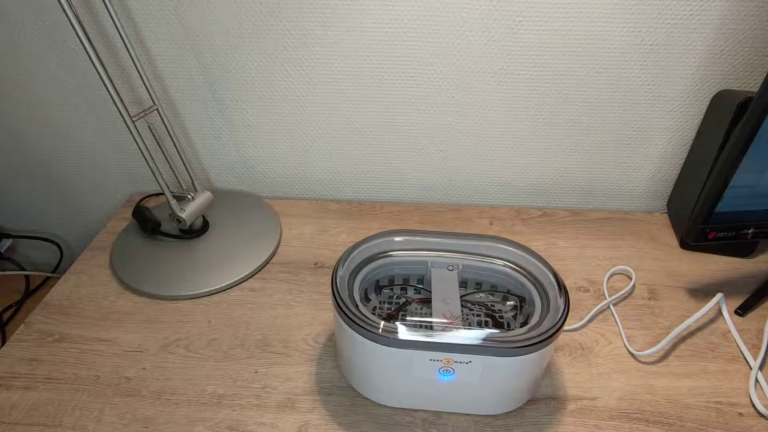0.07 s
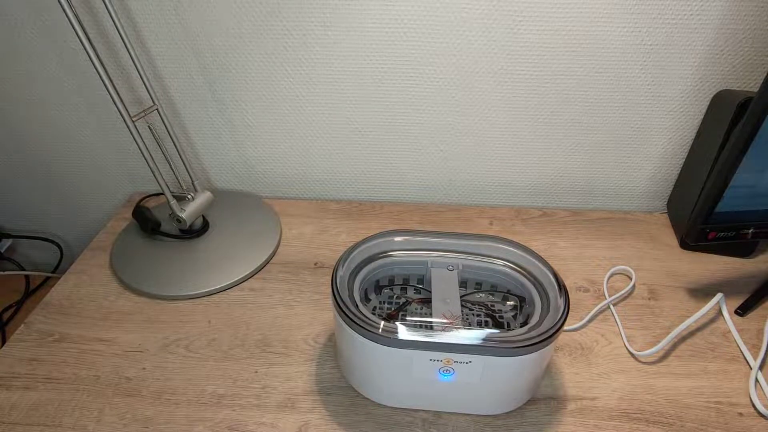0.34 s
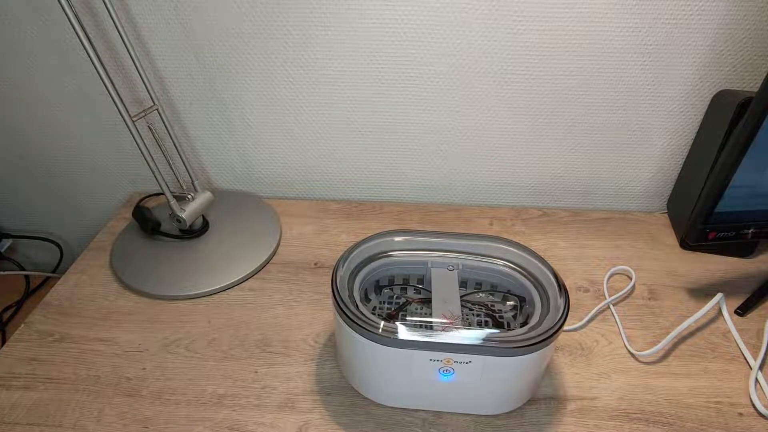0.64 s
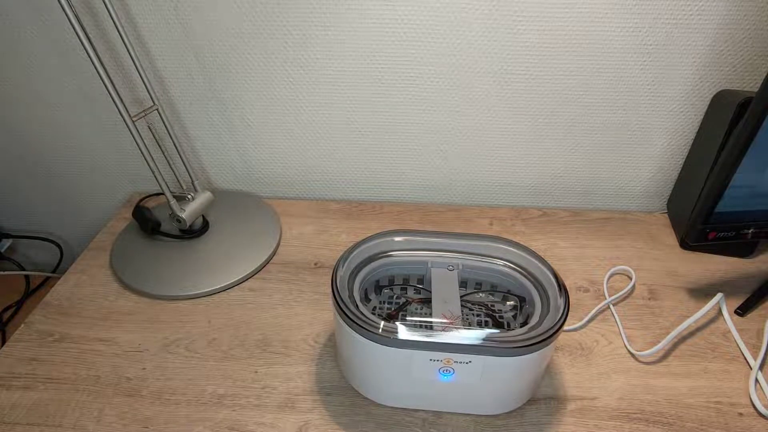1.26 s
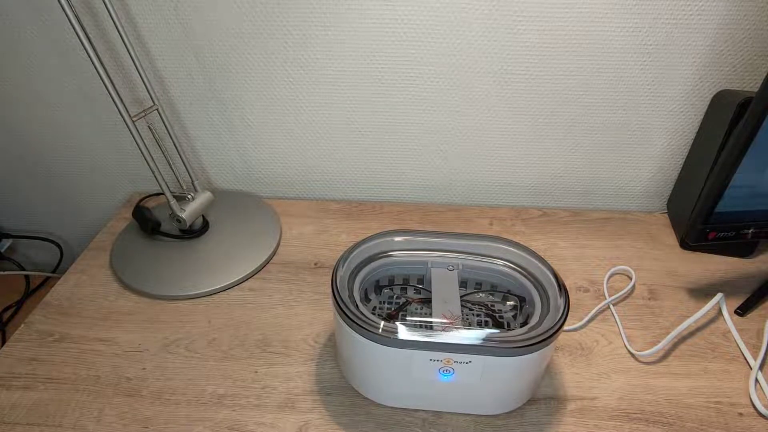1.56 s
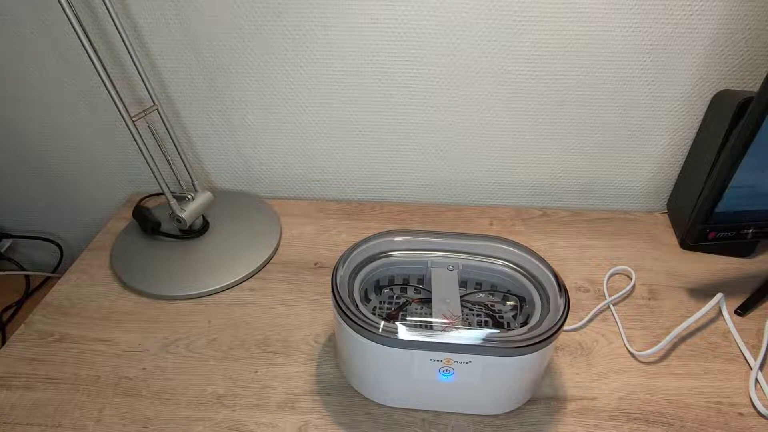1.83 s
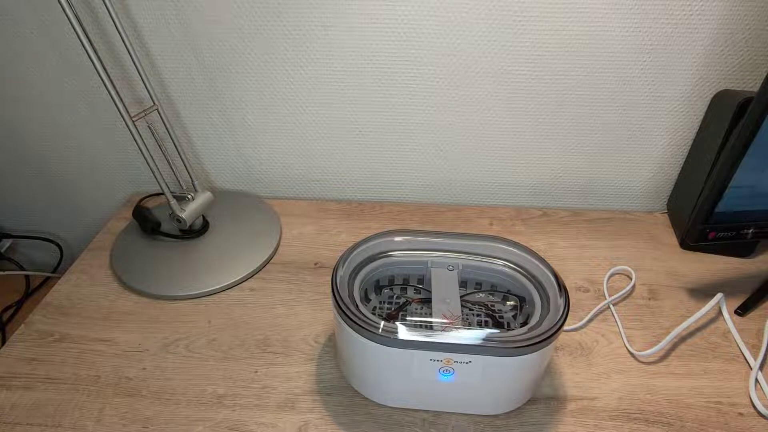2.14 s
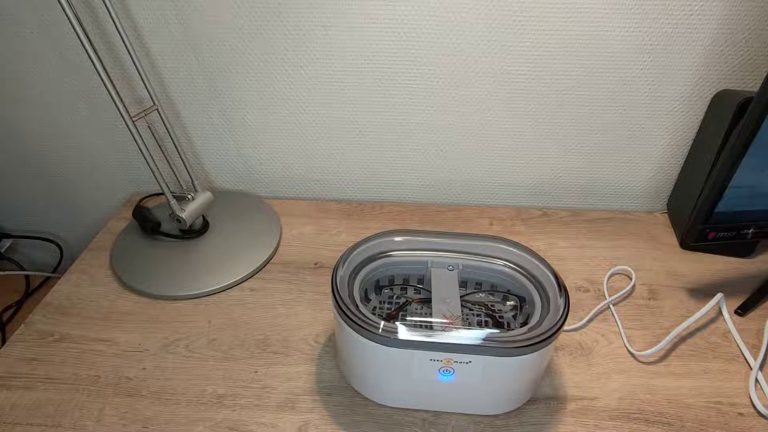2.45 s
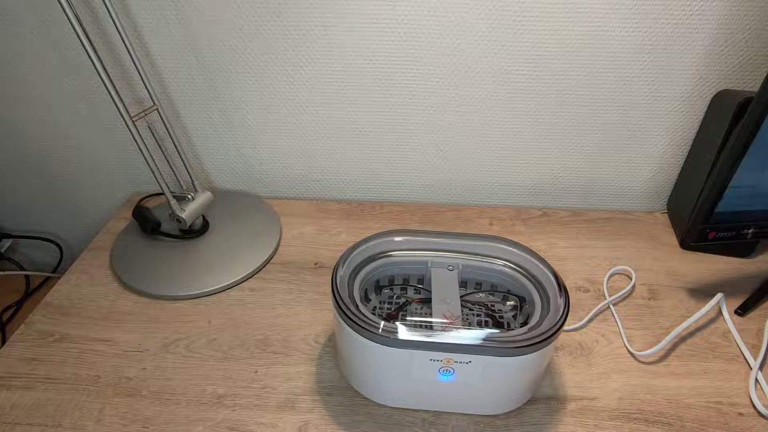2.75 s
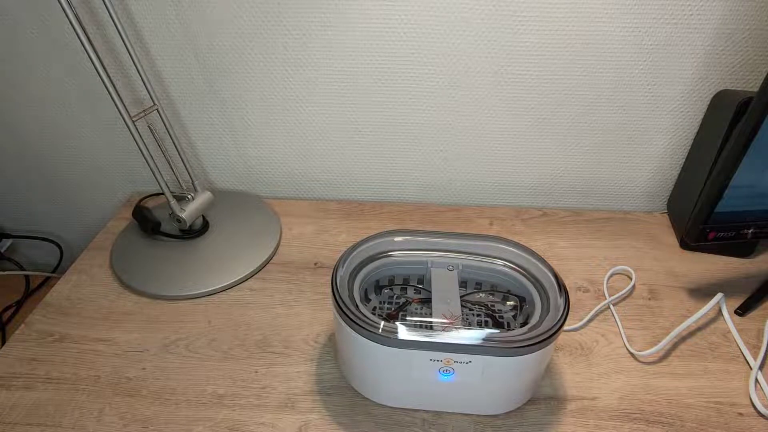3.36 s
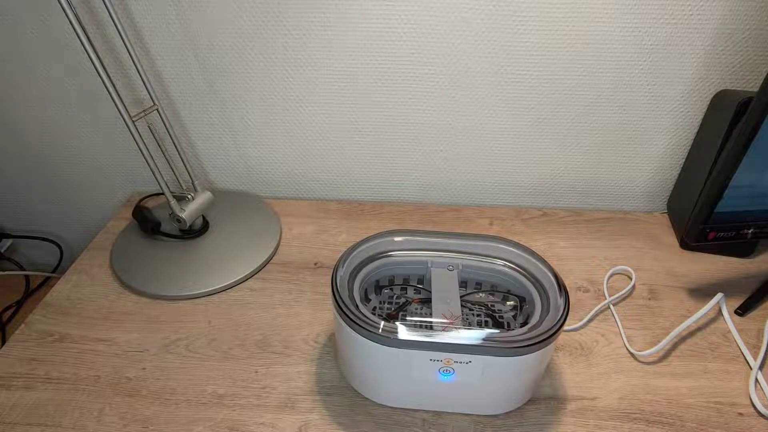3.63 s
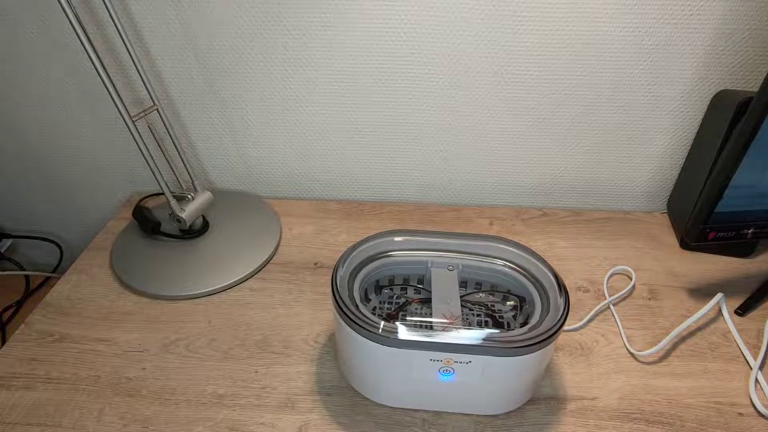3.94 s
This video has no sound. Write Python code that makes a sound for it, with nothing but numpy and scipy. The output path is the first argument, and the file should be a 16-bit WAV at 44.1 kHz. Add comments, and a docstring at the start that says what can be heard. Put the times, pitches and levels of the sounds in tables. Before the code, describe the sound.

A small ultrasonic cleaner runs close by for the whole four seconds, making a steady electric buzz with a high, fizzing hiss and tiny pings from the water tank. At about 0.2 seconds the bath sputters in a quick run of sharp ticks. The buzz and hiss carry on evenly, and at about 3.8 seconds something gives a short, bright, ringing rattle in the tank.

```python
"""A steady buzz and a fizzing hiss: a small ultrasonic cleaner runs on a desk in a small room.
Its drive swells once per mains cycle. Each swell knocks the tank (the buzz) and makes tiny bubbles
collapse in the water (the hiss, called cavitation); single big collapses make the tank ping.
The bath sputters briefly near the start and gives a short ringing rattle near the end.
Two dull scuffs and a faint rumble lie below."""
import sys
import numpy as np
from scipy import signal
from scipy.fft import rfft, irfft
from scipy.io import wavfile
from scipy.ndimage import uniform_filter1d

SR = 44100
rng = np.random.default_rng(int(sys.argv[2]) if len(sys.argv) > 2 else 0)


def dump(signal):
    """Clip the signal to [-1, 1] and save it as 16-bit WAV at the path in sys.argv[1]."""
    limited = np.clip(np.atleast_2d(signal).T, -1, 1)
    pcm = np.round(limited * 32767).astype(np.int16)
    wavfile.write(sys.argv[1], SR, pcm)


N = 176400
T = np.arange(N) / SR
BINS = np.fft.rfftfreq(N, 1 / SR)
MAINS_HZ = 49.986
BURST_START_S, BURST_RISE_S = 0.015, 0.0052  # timing of the hiss bursts

# Stereo width, as the side (left minus right) against the middle: f/Hz, level/dB
WIDTH = [(100, -19), (300, -14), (600, -8), (1000, -1.5), (1300, -7), (1650, -2), (2100, -7), (2600, -3.5),
         (3000, -19), (3400, -9.5), (3800, -3.5), (4800, -1.5), (7500, -1), (11000, 0), (14000, -1.5),
         (15700, -4)]


def tank_buzz(count=180, size=882, groups=4):
    """The same knocks repeat every mains cycle and blur into a buzz that wavers as the water moves."""
    # Lower harmonics of the buzz: multiple of the mains frequency, relative level/dB
    harmonics = [(1, -32.5), (2, -33), (3, -57), (4, -28.5), (5, -9.5), (6, -18.5), (7, -13.5), (8, -16),
                 (9, -7.5), (10, -14.5), (11, -4.5), (12, 0.5), (13, -10), (14, -3.5), (15, -10.5),
                 (16, -4), (17, -2), (18, -8.5), (19, -7), (20, -19), (21, -10.5), (22, -11), (23, -8.5),
                 (24, -4.5), (25, -5.5), (26, -4), (27, -8), (28, -9), (29, -6), (30, -56)]
    # Outline of the upper harmonics: f/Hz, relative level/dB
    upper_outline = [(1550, -13.5), (1700, -24.5), (1800, -10), (2150, -26), (2400, -16.5), (2550, -28.5),
                     (2800, -12.5), (2980, -4), (3080, -12), (3150, -5), (3270, -22.5), (3410, 1.5),
                     (3600, -7), (3740, -13), (3900, -17), (4050, -6.5), (4300, -15), (4600, -14.5),
                     (5650, -20.5), (6300, -15), (9000, -27)]
    # The four knocks in each cycle: t/s after the first, relative level/dB
    knocks = [(0, 0), (.0036, -4), (.0096, -3), (.0135, -9)]
    # Slow swell of the buzz: t/s, gain/dB
    swell = [(0, -2.7), (.6, 0), (1.2, .3), (1.8, 0.3), (2.4, 0), (3, -0.26), (4, -0.5)]
    first_knock_s, mid_lag_s = .0163, .001435
    waver_db, waver_rad = 1.43, 0.092
    k = np.arange(1, count + 1)
    hz, age = k * MAINS_HZ, np.arange(size) / SR
    level_db = at_hz(upper_outline, hz) - 62
    level_db[:len(harmonics)] = np.array(harmonics)[:, 1] - 61
    levels = np.sqrt(2) * from_db(level_db)
    side = 1j * from_db(at_hz(WIDTH, hz)) * rng.choice([-1, 1], count)
    dull = sum(from_db(db) * knock_shape((age - s) % (1 / MAINS_HZ), decay_s=.0017) for s, db in knocks)
    ringing = knock_shape(age, decay_s=.008)
    low, top = hz < 1000, k > len(harmonics)
    mid = ~low & ~top
    bands = (low, dull), (mid, dull), (top, ringing)
    phase = sum(knock_phases(levels * band, shape) for band, shape in bands)
    phase -= 2 * np.pi * hz * mid_lag_s * mid  # the tank answers later from 1 to 1.5 kHz
    tones = levels * np.exp(1j * phase)
    steps = size * 20  # one finely drawn cycle, played in a loop
    place = ((T - first_knock_s) * MAINS_HZ % 1 * steps).astype(int) % steps
    out = np.zeros((2, N))
    for group in range(groups):  # each group of harmonics wavers on its own
        waver = from_db(waver_db * drift(2.1)) * np.exp(1j * waver_rad * drift(2.9))
        for ear, sign in enumerate((1, -1)):
            ear_tones = tones * (1 + sign * side) * (k % groups == group)
            cycle = np.fft.ifft(np.r_[0, ear_tones], steps) * steps
            out[ear] += (cycle[place] * waver).real
    return out * from_db(np.interp(T, *np.transpose(swell)))


def knock_shape(age, decay_s, rise_s=0.00055):
    """A knock rises quickly, then dies away."""
    return (1 - np.exp(-age / rise_s)) * np.exp(-age / decay_s)


def knock_phases(levels, envelope, rounds=6):
    """Line up harmonics of the given levels so that one cycle swells and dies like the envelope."""
    k, size = np.arange(1, len(levels) + 1), len(envelope)
    cycle = rng.standard_normal(size)
    for _ in range(rounds):
        flattened = cycle / (abs(cycle) + 1e-18) ** .85
        phase = np.angle(np.fft.fft(envelope * flattened)[k])
        cycle = np.fft.ifft(np.r_[0, levels * np.exp(1j * phase)], size)
    return phase * (levels > 0)


def bubble_hiss():
    """Bubbles collapse in one burst per mains cycle, each of its own strength, over a lingering wash."""
    # Tone colour of the hiss: f/Hz, level/dB in each hertz before the gains below
    colour = [(150, -109.3), (230, -102.6), (400, -96), (580, -93), (900, -95), (1300, -92), (1480, -92),
              (1680, -100.4), (2100, -93), (2600, -91), (3050, -90), (3230, -82), (3450, -84),
              (3600, -87.5), (3750, -82.5), (3950, -86.5), (4700, -85.5), (5400, -85.5), (5650, -85),
              (5900, -89), (7100, -87.5), (7550, -88.5), (7800, -86), (8150, -87.5), (8700, -89),
              (9500, -90), (10500, -89), (12300, -90), (13700, -86.5), (14400, -86), (14950, -81.5),
              (15250, -91), (15700, -81)]
    # Wash left in tank and room between bursts: f/Hz, level/dB against the burst
    wash_levels = [(300, -1), (1200, 13), (2100, 6.5), (3400, -0.5), (5000, -5.5), (7500, -10.5),
                   (11000, -13), (14500, -10)]
    # Slow swell of the hiss: t/s, then gain/dB near 3.5, 5, 9 and 15 kHz
    swell = [(0, 3, 1.5, 0, -2.5), (0.5, -1, -1.7, 1, 0.5), (0.7, 1, -1.5, -1, -0.6),
             (0.8, 1.5, 0, 0.8, -0.1), (0.92, -0.6, -0.7, -0.5, -1), (1.12, -1, 0.5, 0, -1.5),
             (1.35, 1, 3.5, -0.5, 0.2), (1.6, 0.5, -0.5, -0.7, -0.9), (1.9, -2.5, -0.8, 0.0, -1.5),
             (2.1, -0.5, -1.5, 0.3, -2), (2.25, -1.5, 0.7, -0.3, 0), (2.55, -0.5, -1.3, -0.1, -1),
             (2.8, 0.5, -1.5, 1.1, 1.2), (2.97, 4.5, -1.5, 1.2, -1), (3.15, -1.5, -1, -1, -1),
             (3.4, -0.2, 1.1, 0.8, 0.7), (3.6, 0.4, -1, -0.6, 0.4), (4.0, 0, -1.3, 0.9, -1)]
    hold_s, decay_s = 0.0017, 0.0063
    gain_db, burst_spread_db, band_spread_db = -0.59, 0.78, 1.6
    cycles = (T - BURST_START_S) * MAINS_HZ + 1
    number, age = cycles.astype(int), cycles % 1 / MAINS_HZ
    rise = np.sin(np.pi / 2 * np.minimum(age / BURST_RISE_S, 1)) ** 2
    burst = rise * np.exp(-np.maximum(age - BURST_RISE_S - hold_s, 0) / decay_s)
    burst_db = burst_spread_db * rng.standard_normal(N)[number]
    times, *columns = np.transpose(swell)
    ring, middle, high, top = [np.interp(T, times, column) for column in columns]
    edges_hz = [130, 1000, 1600, 2850, 4100, 6300, 9000, 13000, 17000]
    band_swells = 0, 0, 0, ring, middle, high, high, top
    spectrum, out = noise_spectrum(colour), 0
    for low_hz, high_hz, swell_db in zip(edges_hz, edges_hz[1:], band_swells):
        band = irfft(spectrum * (BINS >= low_hz) * (BINS < high_hz), N)
        strength = from_db(burst_db + band_spread_db * rng.standard_normal(N)[number])
        wash = from_db(at_hz(wash_levels, np.sqrt(low_hz * high_hz)))
        envelope = rms_one(np.hypot(burst * strength, wash))
        out += band * envelope * from_db(gain_db + swell_db)
    return out


def tank_pings(per_second=45, spread_db=3.5):
    """Single big collapses near the peak of a burst set the tank ringing, at random moments."""
    # Notes the tank rings at: f/Hz, level/dB, time to fade by 60 dB/s
    notes = [(3210, -67, 0.042), (3413, -60.5, 0.021), (3733, -62.5, 0.042), (4695, -65.5, 0.022),
             (5688, -62, 0.032), (7490, -65.5, 0.029), (8100, -68.5, .025), (13500, -64, .015),
             (14950, -64, .015)]
    near_peak = np.maximum(np.cos(2 * np.pi * (T - BURST_START_S - BURST_RISE_S) * MAINS_HZ), 0) ** 2
    chance = per_second * near_peak / near_peak.mean() / SR
    out = 0
    for hz, db, fade_s in notes:
        collapses = rng.random((2, N)) < chance
        clicks = collapses * from_db(spread_db * rng.uniform(-1.1, 1, (2, N)) + 2 * drift(2.2))
        decay, angle = from_db(-60 / (fade_s * SR)), 2 * np.pi * hz / SR
        ringing = signal.lfilter([1, 0, -1], [1, -2 * decay * np.cos(angle), decay ** 2], clicks + 1e-18)
        out += from_db(db) * stereo(*rms_one(ringing), hz)
    return out


def sputter():
    """The bath spits: a quick run of sharp ticks, each with a short ring."""
    # Spits: t/s, level/dB, decay/s
    spits = [(.194, -43, .004), (.2, -49, .007), (.204, -38, .003), (.216, -45, .003), (.235, -37, 0.0033),
             (.2455, -35, 0.0022), (.2565, -35, .004), (.2695, -31, 0.0038), (.2722, -35.5, .0015),
             (.283, -48, .003), (.291, -39.5, .004)]
    # Tone colour of a spit: f/Hz, relative level/dB
    colour = [(60, -14), (200, -12), (420, -14), (700, -1), (1000, -0.5), (1550, -9), (1950, 5), (2650, -3),
              (3900, 4.5), (5200, -4), (6600, -1), (7500, 4), (9000, -7), (15500, -5)]
    # Notes a spit rings: f/Hz, relative level/dB, time to fade by 60 dB/s
    notes = [(1945, -9, 0.026), (3900, -2, 0.01), (7400, -8, .012)]
    return ring_notes(spits, notes) + noise_bursts(spits, colour, tail_db=-9.5, tail_s=0.019)


def rattle():
    """Something rattles in the tank: each contact clicks and rings."""
    # Contacts: t/s, level/dB, decay/s
    contacts = [(3.789, -27.5, 0.0031), (3.7935, -31, 0.0023), (3.7972, -32, 0.0027),
                (3.8006, -30.5, 0.0037), (3.8075, -40, .002), (3.812, -45, .002), (3.8183, -36, .003)]
    # Tone colour of a click: f/Hz, relative level/dB
    colour = [(1200, -33), (2400, -3.5), (3100, -10), (3800, 8), (4600, 1), (5400, -20), (9000, -11),
              (10000, -2), (12500, -6), (15000, -7)]
    # Notes a contact rings: f/Hz, relative level/dB, time to fade by 60 dB/s
    notes = [(3560, -8, .014), (3800, -1.5, 0.021), (4070, 0, 0.013), (4300, -16, .01)]
    clicks = noise_bursts(contacts, colour, tail_db=-19, tail_s=0.032)
    return ring_notes(contacts, notes) + from_db(-0.5) * clicks


def scuffs():
    """Two faint, dull puffs of noise."""
    # Scuffs: t/s, level/dB, decay/s
    events = [(.72, -68, .02), (3.875, -56, .02)]
    # Their tone colour: f/Hz, relative level/dB
    colour = [(60, -16), (170, -21), (340, 14), (600, 1), (1100, -5), (2000, -4), (5000, -36)]
    return noise_bursts(events, colour, tail_db=-7, tail_s=0.066, smooth_samples=400)


def rumble(flutter_db=3, bump_hz=47.8, bump_rise_s=0.023):
    """A faint, uneven rumble with soft bumps that swell and die within a few cycles."""
    # Tone colour of the rumble: f/Hz, relative level/dB
    colour = [(20, -19), (33, -10), (44, -5), (60, -2), (90, 6.5), (125, -10), (250, -28)]
    # The loudness it flutters around: t/s, level/dB
    loudness = [(0, -82), (.2, -92), (.28, -71), (.42, -84), (.65, -75), (1, -87), (2.2, -84), (2.38, -77),
                (2.55, -91), (3.2, -79.5), (3.38, -71), (3.53, -78), (3.68, -70), (3.87, -73), (4, -80)]
    # Soft low bumps: t/s, peak level/dB
    bumps = [(.27, -68), (.56, -76), (.89, -81), (1.31, -74), (1.99, -73), (2.33, -68), (3.0, -78),
             (3.29, -66), (3.39, -64), (3.64, -64), (3.79, -66), (3.86, -62)]
    out = noise(colour) * from_db(np.interp(T, *np.transpose(loudness)) + flutter_db * drift(31))
    for s, db in bumps:
        age = np.maximum(T - s, 0)
        envelope = age / bump_rise_s * np.exp(1 - age / bump_rise_s)
        out += from_db(db) * envelope * np.sin(2 * np.pi * bump_hz * age)
    return out


def ring_notes(events, notes, rise_s=.0004):
    """Each hit starts a few pure tones that fade away."""
    out = np.zeros(N)
    for s, db, _ in events:
        start = int(s * SR)
        age = T[:min(SR // 10, N - start)]
        onset = 1 - np.exp(-(age / rise_s) ** 2)
        for hz, note_db, fade_s in notes:
            envelope = onset * from_db(db + note_db - 60 * age / fade_s)
            out[start:start + len(age)] += envelope * np.sin(2 * np.pi * hz * age)
    return out


def noise_bursts(events, colour, tail_db, tail_s, smooth_samples=48):
    """Sudden bursts of noise die quickly and leave a faint tail in the room."""
    power = 0
    for s, db, decay_s in events:
        age = np.maximum(T - s, 0)
        tail = from_db(tail_db) ** 2 * np.exp(-2 * age / tail_s)
        power += (T >= s) * from_db(db) ** 2 * (np.exp(-2 * age / decay_s) + tail)
    hiss = noise(colour)
    hiss_power = uniform_filter1d(np.mean(hiss ** 2, axis=0), smooth_samples)
    return hiss * np.sqrt(power / hiss_power)  # dividing evens out the noise's own ups and downs


def noise(colour):
    """Stereo noise with the given tone colour and an average (rms) level of 1."""
    return rms_one(irfft(noise_spectrum(colour), N))


def noise_spectrum(colour):
    """Spectrum of stereo noise whose table gives the dB in each hertz."""
    mid, side = rfft(rng.standard_normal((2, N))) * from_db(at_hz(colour, BINS)) * np.sqrt(SR / 2)
    return stereo(mid, side, BINS)


def stereo(mid, side, hz):
    """Add the side on the left and subtract it on the right, for the width of the room."""
    return mid + side * from_db(at_hz(WIDTH, hz)) * np.array([[1], [-1]])


def drift(rate):
    """A smooth random wander of typical size 1, changing about rate times a second."""
    return rms_one(irfft(rfft(rng.standard_normal(N)) / (1 + (BINS / rate) ** 2), N))


def at_hz(points, hz):
    """Read between a table's rows, with octaves evenly spaced."""
    f, value = np.transpose(points)
    return np.interp(np.log(np.maximum(hz, 1)), np.log(f), value)


def rms_one(x):
    """Scale to an average (rms) level of 1."""
    return x / np.sqrt(np.mean(x ** 2))


def from_db(db):
    """Turn decibels into a gain."""
    return 10 ** (np.asarray(db) / 20)


def scene():
    """The running cleaner, its sputter and rattle, and the low background."""
    return tank_buzz() + bubble_hiss() + tank_pings() + sputter() + rattle() + scuffs() + rumble()


def record(dry, cutoff_hz=15830):
    """The highest treble is cut off steeply."""
    return signal.sosfilt(signal.ellip(14, .1, 80, cutoff_hz, fs=SR, output="sos"), dry)


dry = scene()
out = record(dry)
dump(out)
```